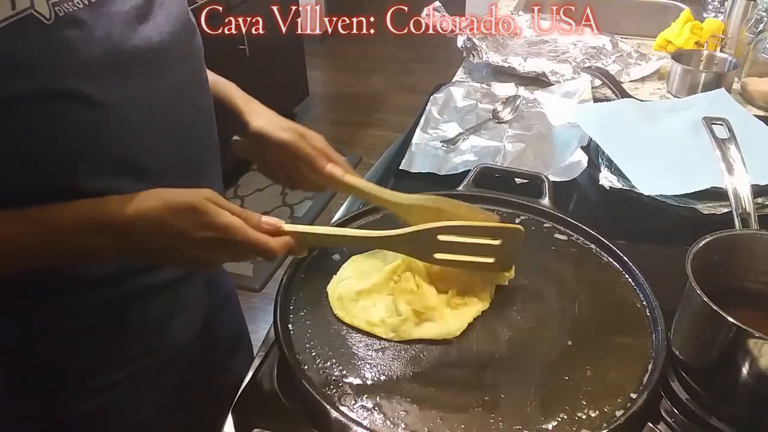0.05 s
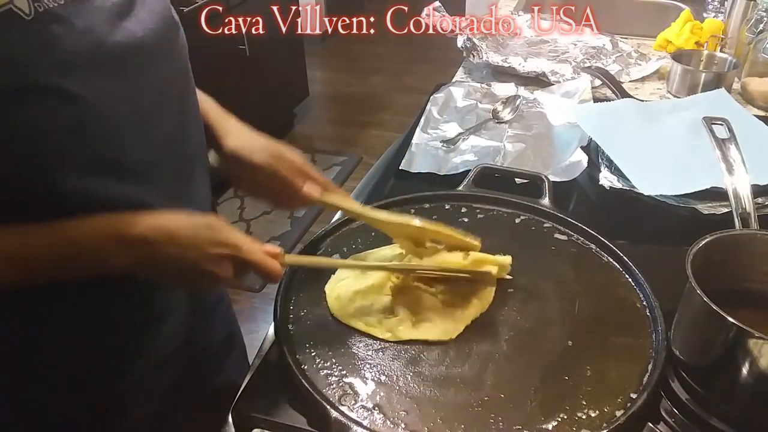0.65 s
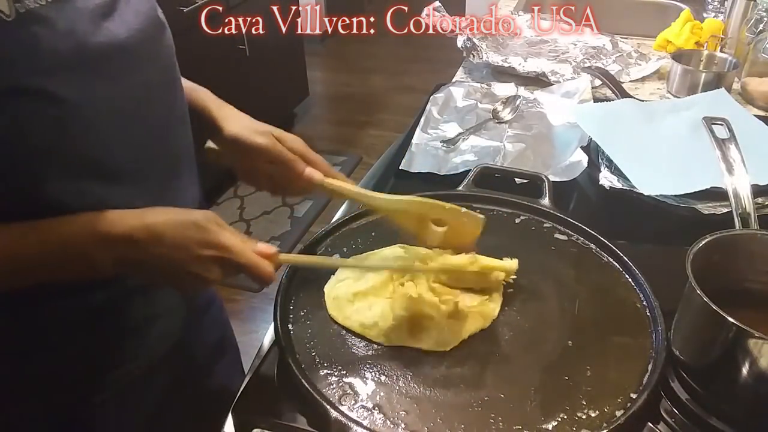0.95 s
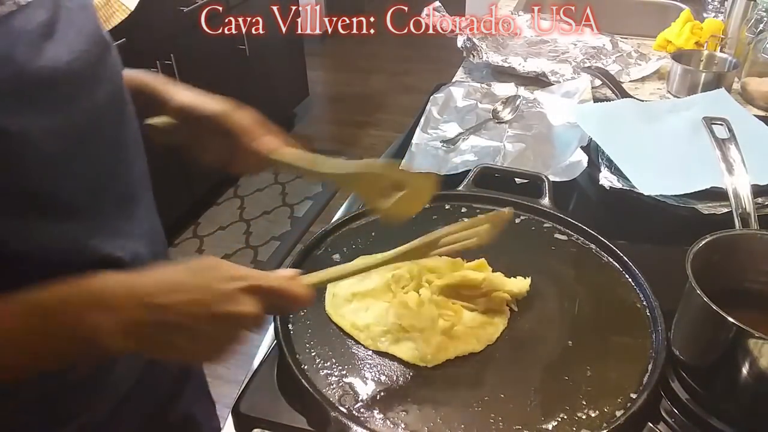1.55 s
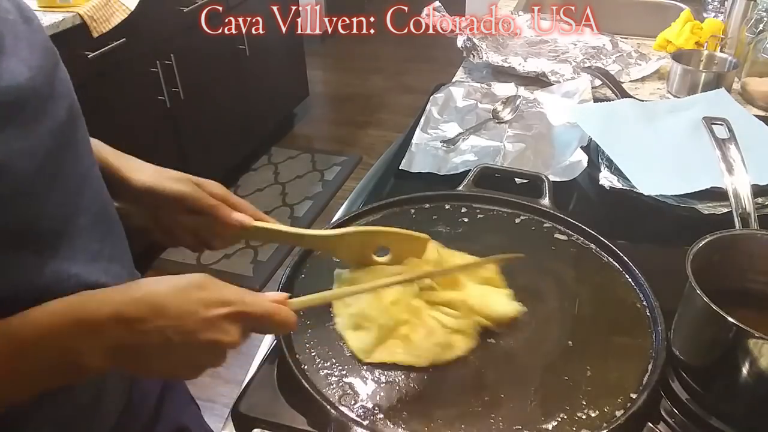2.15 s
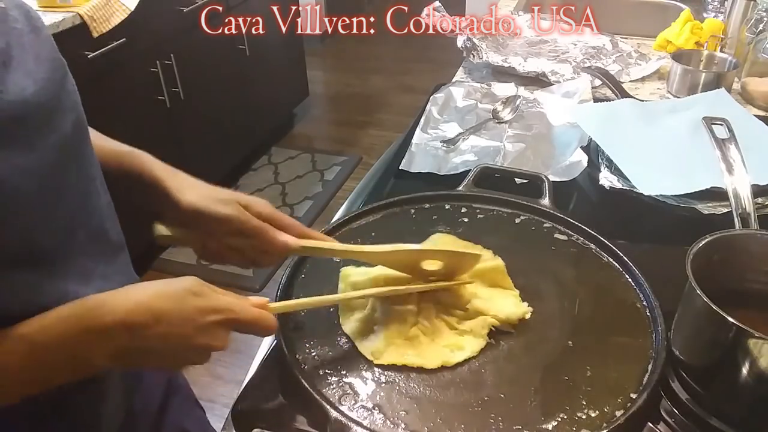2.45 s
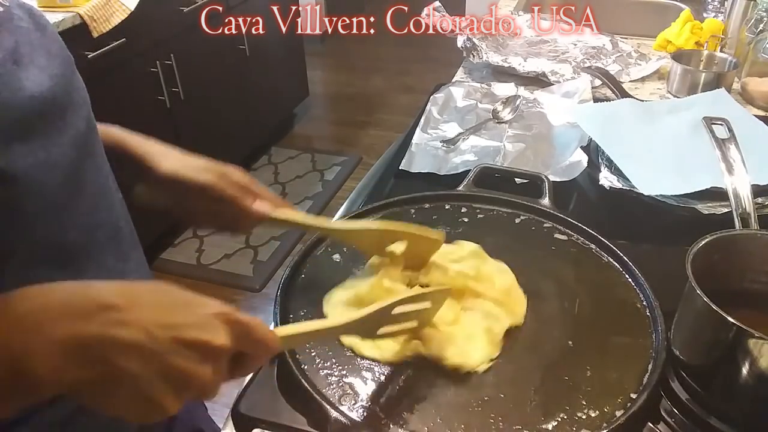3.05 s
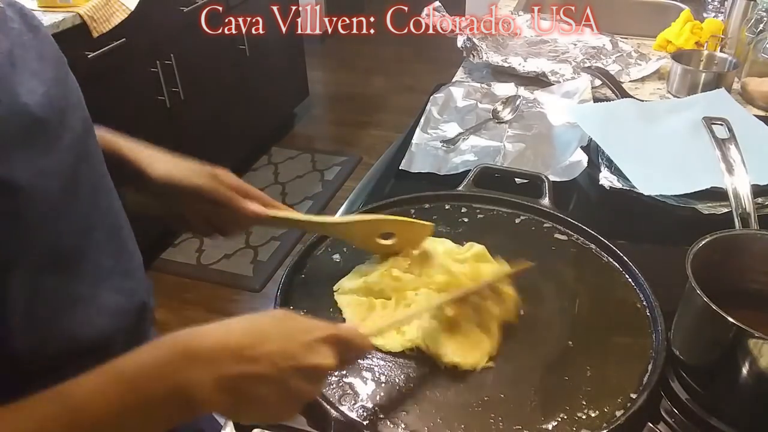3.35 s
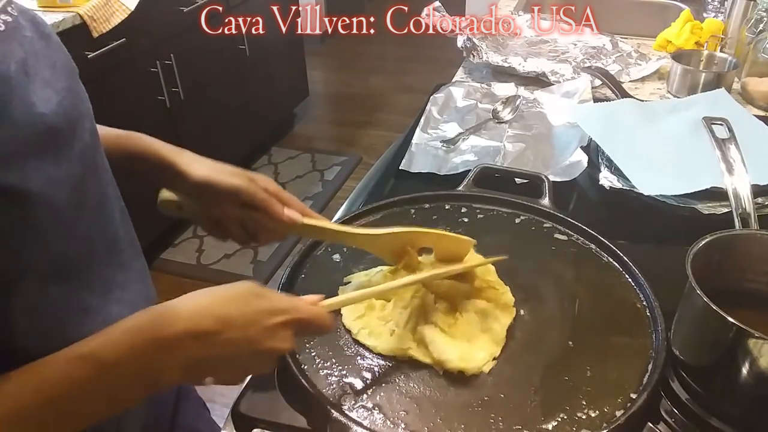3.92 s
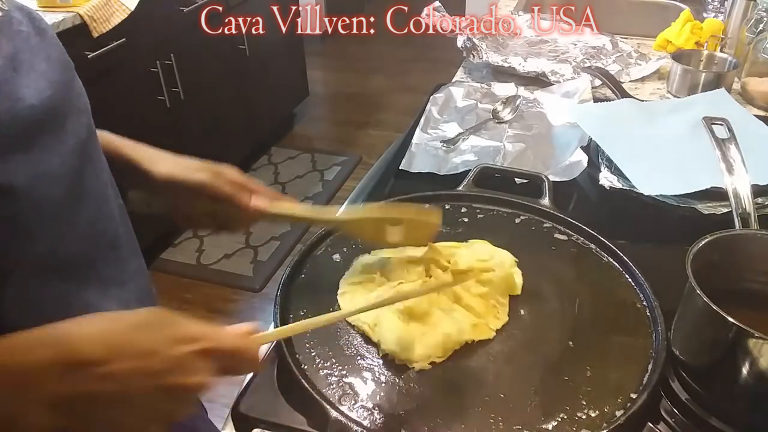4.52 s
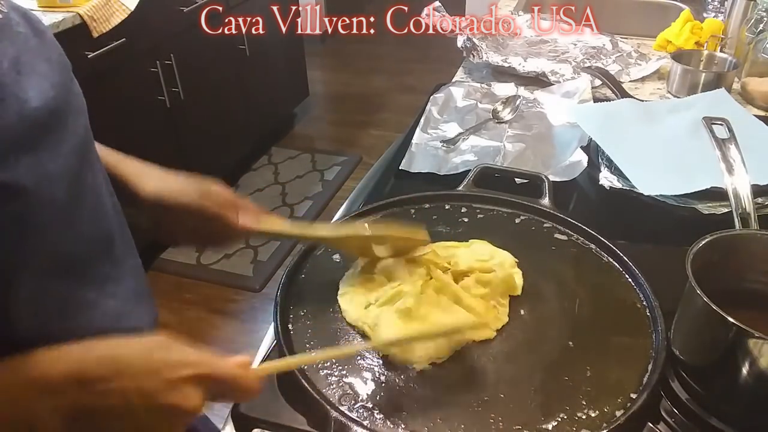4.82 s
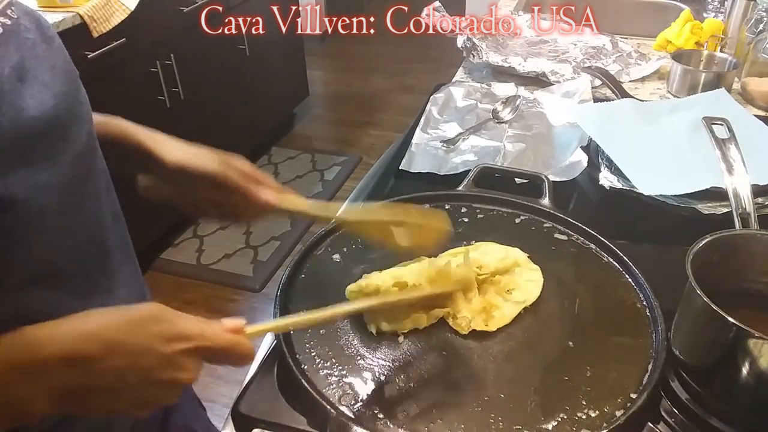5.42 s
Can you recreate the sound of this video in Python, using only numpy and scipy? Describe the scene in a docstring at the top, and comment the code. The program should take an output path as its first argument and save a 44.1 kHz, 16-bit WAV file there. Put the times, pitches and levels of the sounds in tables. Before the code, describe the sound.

Two wooden spatulas knock, tick and scrape on an oiled griddle, tearing flatbread over a low fan hum.

```python
"""A small, hard-walled kitchen, one microphone close above the stove. A fan hums low from the start.
Two wooden spatulas tick together, knock on the oiled griddle and scrape in short stick-slip strokes,
tearing a flatbread. The pressed plate thumps softly, a dragged blade sings and an edge squeaks once.
From 1.5 s oil spits faintly; from 2 s the slotted spatula grazes the plate and its tines chatter.
The hardest push comes just after 5 s. The room answers every contact."""
import sys
import numpy as np
from scipy import signal
from scipy.fft import rfft, irfft, next_fast_len
from scipy.io import wavfile
from scipy.ndimage import map_coordinates

SR = 44100
rng = np.random.default_rng(int(sys.argv[2]) if len(sys.argv) > 2 else 0)


def bounce(signal):
    """Save signal as a 16-bit WAV file at the path given by the first command-line argument."""
    frames = np.transpose(np.atleast_2d(signal))
    limited = np.clip(frames, -1, 1)
    pcm = np.round(limited * 32767).astype(np.int16)
    wavfile.write(sys.argv[1], SR, pcm)


N = 250288
LENGTH = 3 * 2 ** 13  # samples in one contact with its echoes, about 0.56 s
T, HZ = np.arange(LENGTH) / SR, np.fft.rfftfreq(LENGTH, 1 / SR)


def amp(db):
    """Decibels to gain."""
    return 10 ** (np.asarray(db) / 20)


def unit(x):
    """Scaled to rms 1."""
    return x / np.sqrt(np.mean(x ** 2) + 1e-20)


def along(points, hz):
    """A curve through (frequency_hz, value) points on a log frequency axis."""
    frequencies, values = np.transpose(points)
    return np.interp(np.log(hz + 1), np.log(frequencies), values)


def add(track, s, x):
    """Mix x into the track from time s on."""
    start = max(round(s * SR), 0)
    track[start:start + len(x)] += x[:N - start]


def wander(knots, count=LENGTH):
    """A smooth random curve of count points."""
    return map_coordinates(rng.standard_normal(int(knots) + 4), [np.arange(count) * knots / count])


def resonant(modes, base_db):
    """Gain of a body: its resonances stand over a flat base."""
    peaks = sum(amp(db) ** 2 / (1 + (2 * (HZ - hz) / width) ** 2) for hz, width, db in modes)
    return np.sqrt(amp(base_db) ** 2 + peaks)


def struck(gain):
    """The causal impulse response with this gain, of energy 1."""
    cepstrum = irfft(np.log(np.maximum(gain, 1e-6)))
    cepstrum[1:LENGTH // 2] *= 2
    cepstrum[LENGTH // 2 + 1:] = 0
    response = irfft(np.exp(rfft(cepstrum)))
    return response / np.linalg.norm(response)


def slips(per_s, spread_db):
    """Tiny stick-slip releases at random moments and of very unequal size."""
    releases = (rng.random(LENGTH) < per_s / SR) * rng.standard_normal(LENGTH)
    return releases * amp(spread_db * rng.standard_normal(LENGTH))


def push(rise_s, fall_s):
    """Force of a stroke and its time to peak: it swells smoothly, then eases by 20 dB in fall_s."""
    lead = min(2 * rise_s, .15)
    swell = np.exp(-2 * ((T - lead) / rise_s) ** 2)
    return np.where(T < lead, swell, amp(-20 * (T - lead) / fall_s)), lead


# Decay of the room around the stove: frequency_hz, t60_s
ROOM_DECAY = [(150, 0.38), (500, 0.31), (1400, 0.35), (3700, 0.39), (10000, 0.24)]
def kitchen(x, wet_db):
    """A contact with its echoes, which differ for every spot on the griddle."""
    hz, t, noise = signal.stft(rng.standard_normal(LENGTH), SR, nperseg=256)
    decay = amp(-60 * t / along(ROOM_DECAY, hz)[:, None])
    tail = signal.istft(noise * decay, SR, nperseg=256)[1][:LENGTH]
    uneven_db = 3 * np.exp(-T / 0.036) * wander(400)  # early wall echoes, soon merging
    tail *= (1 - np.exp(-T / 0.002)) * amp(uneven_db)
    echoes = signal.fftconvolve(x, tail / np.linalg.norm(tail))[:LENGTH]
    fade = np.clip((T[-1] - T) / .1, 0, 1) ** 2
    return fade * (x + amp(wet_db) * echoes)


# Moving air behind everything: frequency_hz, density_db
FAN_AIR = [(15, -36), (30, -79), (60, -28), (90, -15), (150, -7.5), (280, 0.5), (430, -2.5), (700, -8),
           (1100, -10), (2000, -17.5), (3300, -21.5), (4900, -21.5), (6200, -29.5), (8000, -29.5),
           (11500, -32), (13000, -46), (16000, -58)]
# The fan's hum lines: pitch_hz, level_db
FAN_HUM = [(60, -91), (264, -76.5), (404, -82)]
def fan():
    """Steady air noise with a few slightly unsteady lines."""
    t = np.arange(N) / SR
    colour = amp(along(FAN_AIR, np.fft.rfftfreq(N, 1 / SR)))
    air = unit(irfft(rfft(rng.standard_normal(N)) * colour, N))
    hum = sum(amp(db) * np.sin(2 * np.pi * hz * t + 0.41 * wander(45, N)) for hz, db in FAN_HUM)
    return amp(-70.5) * air + hum


# Resonances of the slotted spatula: pitch_hz, width_hz, level_db
TINE_MODES = [(1530, 78, 1), (1810, 110, -11), (2553, 117, -0.5), (2795, 150, -1.5), (3166, 95, -3.5),
              (3700, 92, 1.5), (4063, 55, 1.5), (4270, 76, -4.5), (4780, 170, 1.5), (5150, 220, -0.5),
              (5570, 100, -1.5), (5900, 100, -1), (6580, 280, -8.5), (6970, 160, -0.5), (7530, 170, -7),
              (8940, 77, -13)]
def tines_gain(focus_hz, focus_db=15, focus_octaves=0.23):
    """Narrow modes: the grip shifts each a little, and the contact point favours those near one pitch."""
    gain = np.zeros(len(HZ))
    for hz, width, db in TINE_MODES:
        hz *= 1 + .03 * rng.uniform(-1.03, 1)
        lift_db = focus_db * np.exp(-(np.log2(hz / focus_hz) / focus_octaves) ** 2)
        gain += amp(db + lift_db + 2 * rng.standard_normal()) / (1 + (2 * (HZ - hz) / width) ** 2) ** 1.26
    return gain


# The spatulas touch each other below the microphone: start_s, level_db, pitch_hz
SPATULA_TICKS = [(0.1733, -37, 3050), (0.581, -59, 5150), (1.8432, -54, 3930), (1.991, -43, 3180),
                 (2.951, -52, 3650), (3.001, -51, 3700), (3.172, -47.5, 3700), (4.091, -44.5, 2920),
                 (4.093, -49, 6930), (4.118, -53.5, 4000), (4.274, -49, 2590), (4.284, -57, 4700),
                 (4.476, -56, 5260), (4.538, -50, 4950), (4.985, -59, 7400), (5.076, -67, 4950)]
def ticks(click_t60_s=0.021, note_t60_s=.085):
    """A light touch clicks through the tines' modes and leaves one high note ringing."""
    track = np.zeros(N)
    for s, db, hz in SPATULA_TICKS:
        touch = rng.standard_normal(LENGTH) * amp(-60 * T / click_t60_s)
        click = signal.fftconvolve(touch, struck(tines_gain(hz)))[:LENGTH]
        note = np.sin(2 * np.pi * hz * T) * amp(-9 - 60 * T / note_t60_s)
        add(track, s, kitchen(amp(db - 8.5) * (click + note), wet_db=-2.5))
    return track


# Resonances of the wooden blade: pitch_hz, width_hz, level_db
BLADE_MODES = [(1510, 62, 9), (1880, 46, 2), (2130, 85, 1), (2350, 350, 0.5), (2830, 260, 4.5),
               (3070, 84, -21), (3760, 320, 1.5), (4050, 230, 5), (4900, 540, 0), (4520, 220, 8),
               (5160, 360, 5), (5850, 320, 2), (6680, 300, 1.5), (7080, 250, 2.5), (7520, 85, 8),
               (8140, 810, 1)]
def blade_gain(base_db, scatter_db, ripple_db):
    """The contact point decides how strongly each mode is fed, and cuts notches between them."""
    modes = [(hz, width, db + scatter_db * rng.standard_normal()) for hz, width, db in BLADE_MODES]
    return resonant(modes, base_db) * amp(ripple_db * np.minimum(wander(130, len(HZ)), .8))


# Resonances of the griddle plate: pitch_hz, width_hz, level_db
PLATE_MODES = [(179, 20, -20), (387, 69, -4), (476, 12, -8), (630, 3.7, -35), (645, 4.7, -9), (734, 6.4, 6),
               (760, 25, 8.5), (976, 13, 10.5), (1275, 9.7, 11), (1215, 76, -6), (1593, 45, -14),
               (1690, 27, 6), (1690, 29, 8), (2000, 240, 7), (2200, 7.2, -12), (2660, 44, 13.5)]
def plate_gain(base_db):
    """The plate rings in the same modes whether knocked or scraped."""
    return resonant(PLATE_MODES, base_db)


def rattle(count=5, gap_s=.012, bounce_db=-14, skid_t60_s=.008):
    """One landing, then equal, lighter bounces at uneven gaps, each smeared by a short skid."""
    bounces = np.zeros(LENGTH)
    times = np.cumsum(gap_s * (.5 + rng.random(count)))
    bounces[(times * SR).astype(int)] = amp(bounce_db)
    skid = rng.standard_normal(LENGTH) * amp(-60 * T / skid_t60_s)
    return (T == 0) + signal.fftconvolve(bounces, skid / np.linalg.norm(skid))[:LENGTH]


# Tone of a blow from above the stove: frequency_hz, density_db
KNOCK_COLOUR = [(60, -23), (200, -18), (300, -11.5), (420, 2.5), (800, 3.5), (1600, 1.5), (2000, -1.5),
                (3000, -7), (4300, -14.5), (5400, -22.5), (6500, -31), (9000, -37.5), (12000, -60),
                (15000, -53)]
# Wood lands on the plate; weight shapes the lows, snap the highs:
# start_s, level_db, weight_db, snap_db, room_db, skid_share, spot_hz
PLATE_KNOCKS = [(0.2005, -5.5, 5, 13, -10, 0.48, 800), (0.204, -11.5, 2, 8.5, -4, 0.57, 1130),
                (0.2115, -11.5, 8, 24.5, -2.5, 0.8, 500), (0.227, -15, 15, 19, -11.5, 0.63, 624),
                (0.267, -20.5, 0.5, 6, -17, .6, 790), (0.3030, -22, -20, 13, -25, .7, 1670),
                (0.684, -16, -15.5, 10.5, 2.5, 0.96, 1720), (0.689, -26, 40, 3, -6, 0.99, 553),
                (0.9037, -10, 24, 20.5, 9, 0.47, 600), (0.917, -0.5, -6.5, -1, -3.5, .05, 1530),
                (0.919, -9.5, 23, 22, 2.5, 0.3, 540), (0.9270, -15, 9.5, 25, 6.5, .7, 600),
                (0.992, -14, 18, 7, -1, .8, 640), (1.124, -19.5, -23, 23, 1.5, 0.8, 5900),
                (1.1317, -14, -25, 0, -4, 0.3, 1180), (1.137, -17, -11, 15, -2.5, 1, 2740),
                (1.3384, -13.5, -38, -10, -2.5, 0, 1390), (1.3441, -12, -26, 6, -2.5, 0.5, 1170),
                (1.574, -13, -21, 22.5, -7.5, 0.9, 4400), (2.5712, -12, -14, 33, -0.5, 0.86, 1540),
                (3.9255, -18.5, -22, 35, -5, 0.2, 4400), (5.2090, -11.5, 22, 6, 2, .6, 610),
                (5.226, -10.5, -4, 5, -2.5, 1, 2000), (5.258, -16.5, 11, 6, -0.5, 0.7, 850),
                (5.404, -19, -15, 13, 0, 0.5, 725)]
def knocks(bite_rise_s=0.00092, bite_t60_s=0.027):
    """A pressure pulse, or a brief skid if the blow glances, rings the plate; then the blade rattles."""
    track = np.zeros(N)
    radiation = HZ ** 2 / np.hypot(HZ ** 2, 258 ** 2)  # the small plate gives little below 258 Hz
    body = amp(along(KNOCK_COLOUR, HZ)) * plate_gain(base_db=8) * radiation
    soft = 1 / (1 + 1j * HZ / 3200) ** 2
    for s, db, weight_db, snap_db, room_db, skid, spot_hz in PLATE_KNOCKS:
        contact = amp(along([(750, weight_db), (1500, 0.018), (5000, snap_db)], HZ))
        wood = blade_gain(base_db=8, scatter_db=2, ripple_db=2)
        spot = resonant([(spot_hz, spot_hz / 2.6, 6.5)], base_db=3)  # the struck spot favours one pitch
        onset = 1 - np.exp(-T / (bite_rise_s * np.clip(skid, .01, 1)))
        bite = rng.standard_normal(LENGTH) * onset * amp(-60 * T / bite_t60_s)
        pulse = np.sqrt(1 - np.clip(skid, 0, 1)) * soft
        force = pulse + np.sqrt(np.abs(1 - np.abs(pulse) ** 2)) * rfft(bite / np.linalg.norm(bite))
        blow = irfft(force * rfft(rattle()) * rfft(struck(body * contact * wood * spot)))
        add(track, s, kitchen(amp(db - 3.5) * blow, wet_db=room_db))
    return track


def breakaway(rise_s, lead_s, slide_share=0.6):
    """Past the strongest push the blade comes unstuck and slides with less friction."""
    sliding = np.maximum(T - lead_s, 0) / (3 * rise_s)
    return slide_share + (1 - slide_share) * np.exp(-sliding ** 2)


def squelch(pitch_hz=2905, spread_octaves=.55, swell_s=0.005):
    """Small pockets of oil under the bread open at random moments, each with a brief note of its own."""
    when, pitch, size = rng.random(size=(3, 40, 1))
    t = T[:LENGTH // 12]
    hz = pitch_hz * 2 ** (spread_octaves * np.sqrt(12) * (pitch - .5))
    notes = (.5 + size) * t * np.exp(-t / swell_s) * np.sin(2 * np.pi * hz * t)
    places = (when * LENGTH).astype(int) + np.arange(len(t))
    return unit(np.bincount(places.ravel(), notes.ravel(), LENGTH)[:LENGTH])


# Borders between the plate, blade, rasp, edge and oil bands: frequency_hz
BAND_EDGES_HZ = [1150, 2300, 5600, 9300]
# Tone of a scrape from above the stove: frequency_hz, density_db
SCRAPE_COLOUR = [(110, -34), (180, 5.5), (400, 4.5), (650, 5.5), (1000, -4.5), (1250, -10.5), (1550, -1.5),
                 (2700, -1.5), (4700, -6.5), (6000, -13.5), (8000, -16.5), (10000, -21.5), (12000, -39.5),
                 (15000, -30)]
# Strokes across the griddle, the four band levels relative to the rasp band:
# peak_s, level_db, plate_db, blade_db, edge_db, oil_db, rise_s, fall_s
SCRAPE_STROKES = [(0.204, -51, -16, 8, -6, -26, 0.0078, 0.03),
                  (0.685, -39, -16, -6.5, -12.5, -15, 0.012, 0.11),
                  (0.919, -55, -20, -9, -3, 0, 0.006, 0.033), (1.119, -46, -37, -0.5, -8, -11, 0.01, 0.038),
                  (1.138, -42, -17, 0.5, -13, -18, 0.011, 0.03),
                  (1.338, -46, -38, -5, -8.5, -18, 0.0071, 0.088),
                  (1.556, -51.5, -16, 1, 0, -19, 0.013, 0.041),
                  (1.578, -46, -12.5, 4, -23, -24, 0.0099, 0.01),
                  (2.049, -52, -32, -18, -30, -31, 0.033, 0.092),
                  (2.13, -58, -10.5, -29, -5.5, -14, 0.026, 0.089),
                  (2.344, -42.5, -19, -7.5, -17.5, -40, 0.012, 0.13),
                  (2.424, -45, -18, -2.5, -13, -27.5, 0.061, 0.12),
                  (2.576, -41, -25, -1, -10, -16, 0.011, 0.039),
                  (2.64, -49.5, -36, -31, -10, -20.5, 0.025, 0.2),
                  (2.768, -46, -33, -21, -8.5, -15.5, 0.013, 0.099),
                  (3.2, -67.5, -11, -18, -1.5, -14, 0.022, 0.52),
                  (3.375, -43.5, -34, -15.5, -13, -50, 0.083, 0.088),
                  (3.41, -49.5, -24, -4, -6.5, -36, 0.019, 0.08),
                  (3.711, -42, -27, -18, -9, -18.5, 0.013, 0.099),
                  (3.792, -49.5, -26, -38, -15, -30, .02, 0.11),
                  (3.927, -46, -48, -28, -8, -44, 0.034, 0.041),
                  (4.1, -63, -20, -5, -12, -22, 0.013, 0.059), (4.319, -67, -20, -5, -9, -12, .03, 0.067),
                  (4.649, -58, -29, -15, -11, -19, 0.038, 0.18),
                  (4.736, -39.5, -42, -13, -10.5, -23.5, 0.041, 0.1),
                  (5.197, -36, -3.5, -9, -14, -14.5, 0.0065, 0.067),
                  (5.211, -31, -31, -6, -31, -35, 0.0081, 0.059),
                  (5.231, -37.5, 2, 2, -12, -20, 0.015, 0.12),
                  (5.401, -35.5, -30, -13.5, -20.5, -29, 0.037, 0.046),
                  (5.5, -44.5, -37, -17.5, -19, -23, 0.042, 0.16),
                  (5.562, -46.5, -30, -0.5, -8.5, -30, 0.015, 0.085)]
def scrapes(firm_db=-47.5):
    """Slips under each stroke ring blade and plate; a sharp edge adds hiss and squeezed oil crackles."""
    track = np.zeros(N)
    below = [1 / (1 + (HZ / hz) ** 9) for hz in BAND_EDGES_HZ]
    bands = np.diff([0 * HZ, *below, 1 + 0 * HZ], axis=0)
    colour = amp(along(SCRAPE_COLOUR, HZ))
    plate = colour * plate_gain(base_db=0)
    for s, db, plate_db, blade_db, edge_db, oil_db, rise, fall in SCRAPE_STROKES:
        # a lightly pressed blade chatters in separate slips, with deep valleys between its modes
        pressure_db = db - firm_db
        slips_per_s = np.clip(9000 * amp(1.6 * pressure_db), 2000, 30000)
        friction = rfft(slips(slips_per_s, spread_db=3.6))
        blade = colour * blade_gain(base_db=-6 + .7 * pressure_db, scatter_db=2.5, ripple_db=3.5)
        parts = zip(bands, [plate, blade, blade, blade], [plate_db, blade_db, 0, edge_db])
        rasp = sum(amp(level) * unit(irfft(friction * band * body)) for band, body, level in parts)
        oil = amp(oil_db) * unit(irfft(rfft(slips(per_s=1500, spread_db=2)) * bands[-1] * colour))
        catch_db = 1.5 * wander(55)  # the bread catches and lets go
        grit_db = 1.5 * wander(260)  # crumbs make the slips come in clumps
        blips = amp(-6 - 0.4 * pressure_db) * squelch()  # clearest under a light touch
        force, lead = push(rise, fall)
        force *= breakaway(rise, lead) * amp(catch_db + grit_db)
        add(track, s - lead, kitchen(amp(db - 6.5) * force * (rasp + oil + blips), wet_db=-3.5))
    return track


def nudges(from_s=3, every_s=0.49, level_db=-52.5, pitch_hz=419):
    """Faint rocking while the bread is folded: six more thump rows at uneven moments."""
    chance = 2 * rng.random(size=(6, 3)) - 1
    return [(from_s + every_s * (k + when / 2), level_db + 3 * force, pitch_hz * (1 + .05 * spot), .08)
            for k, (when, force, spot) in enumerate(chance)]


# The griddle gives under a push: start_s, level_db, pitch_hz, t60_s
GRIDDLE_THUMPS = [(0.685, -49, 187, 0.083), (0.737, -43, 175.5, 0.083), (0.922, -43, 198, 0.11),
                  (1.08, -48.5, 174, 0.066), (1.425, -41.5, 420, 0.066), (1.629, -51, 190, 0.09),
                  (2.334, -50, 410, 0.1), (2.36, -45, 180, 0.13), (2.629, -51, 195, 0.1),
                  (2.672, -45.5, 402, 0.12), (2.724, -45.5, 433, 0.089), (2.879, -46.5, 410, 0.073),
                  (3.645, -50, 402, 0.2), (3.664, -44.5, 204.3, 0.18), (3.754, -44, 191, 0.1),
                  (4.064, -50.5, 204, 0.17), (4.36, -50, 213, 0.077), (5.203, -29, 403, 0.095),
                  (5.223, -25, 404, 0.039), (5.239, -37.5, 175.4, 0.21), (5.396, -45, 180, 0.091),
                  (5.525, -48, 196.5, 0.14)]
def thumps():
    """Pushes cushioned by the bread ring only a low mode, whose pitch wavers under the load."""
    track = np.zeros(N)
    for s, db, hz, t60 in GRIDDLE_THUMPS + nudges():
        swell = (1 - np.exp(-T / 0.0028)) ** 2 * amp(-60 * T / t60)
        note = np.sin(2 * np.pi * hz * T + .35 * wander(60))
        add(track, s, kitchen(amp(db - 4.5) * swell * note, wet_db=-4.5))
    return track


# The dragged blade sings: peak_s, level_db, pitch_hz, fall_s
BLADE_NOTES = [(0.686, -44, 1580, .025), (1.124, -54.5, 6056, 0.017), (1.142, -48.5, 3850, 0.018),
               (1.137, -48.5, 1127, 0.054), (1.345, -48.5, 1023, 0.045), (1.584, -62, 1540, 0.048),
               (2.41, -51.5, 1530, 0.054), (2.43, -61, 1870, 0.048), (2.42, -56, 1170, .05),
               (2.439, -55.5, 920, 0.051), (2.585, -55, 1020, 0.027), (2.596, -53.5, 1500, 0.04),
               (2.681, -53.5, 2720, 0.033), (2.772, -50, 2737, 0.053), (2.812, -54, 2450, 0.023),
               (3.208, -65, 1810, 0.07), (3.344, -55.5, 2800, .07), (3.37, -53, 2065, 0.082),
               (3.405, -61, 1770, 0.05), (3.715, -62, 2120, .09), (4.649, -60, 1500, 0.072),
               (4.73, -58, 1750, 0.065), (4.79, -55, 2880, 0.045), (4.861, -58, 2700, 0.039),
               (5.416, -47, 1192, 0.047), (5.6, -58, 2660, 0.091)]
def sings(rise_s=.014, half_width_hz=72):
    """Friction feeds a single narrow resonance for a moment."""
    track = np.zeros(N)
    for s, db, hz, fall in BLADE_NOTES:
        force, lead = push(rise_s, fall)
        note = unit(irfft(rfft(rng.standard_normal(LENGTH)) / (1 + ((HZ - hz) / half_width_hz) ** 4)))
        add(track, s - lead, kitchen(amp(db - 1.5) * force * note, wet_db=-4))
    return track


# One chirp of an oily edge on the plate: peak_s, level_db, pitch_hz, rise_s, fall_s
EDGE_SQUEAK = (0.823, -52, 730, .009, .13)
# Its harmonics: multiple, level_db
SQUEAK_HARMONICS = [(1, 0), (2, -1), (3, -1), (4, -8), (6, -13), (7, -14)]
def squeak():
    """Wood sticks and slips at a nearly even rate, giving an unsteady pitch."""
    track = np.zeros(N)
    s, db, hz, rise, fall = EDGE_SQUEAK
    phase = 2 * np.pi * np.cumsum(hz * amp(.35 * wander(200))) / SR
    tone = unit(sum(amp(level) * np.sin(k * phase) for k, level in SQUEAK_HARMONICS))
    force, lead = push(rise, fall)
    add(track, s - lead, kitchen(amp(db) * force * tone, wet_db=-4))
    return track


# Oil fizzes, with little room on it at the microphone: peak_s, level_db, pitch_hz, fall_s
OIL_SPITS = [(1.545, -77, 13800, 0.057), (1.85, -77, 14800, 0.08), (2.075, -76, 13500, 0.051),
             (2.138, -77, 15400, 0.085), (3.18, -70.5, 8630, 0.11), (4.63, -70.5, 8700, 0.14),
             (4.73, -66, 9100, 0.064)]
def spits(rise_s=.008, relative_width=0.066):
    """Tiny oil bubbles of like size burst in a cluster."""
    track = np.zeros(N)
    for s, db, hz, fall in OIL_SPITS:
        swell, lead = push(rise_s, fall)
        bursts = slips(per_s=1500, spread_db=1)
        fizz = unit(irfft(rfft(bursts) / (1 + ((HZ / hz - 1) / relative_width) ** 4)))
        add(track, s - lead, kitchen(amp(db) * swell * fizz, wet_db=-13.5))
    return track


# The slotted spatula grazes the plate: peak_s, level_db, focus_hz, rise_s, fall_s
TINE_GRAZES = [(1.998, -53.5, 2980, 0.0093, 0.057), (2.047, -56, 3370, 0.029, 0.099),
               (2.136, -64.5, 5200, 0.0097, 0.14), (2.89, -60.5, 5150, 0.025, 0.14),
               (3.177, -63, 4100, .006, 0.077), (3.253, -60.5, 2670, 0.035, 0.34),
               (4.098, -67, 2660, .007, 0.055), (4.281, -62.5, 2730, 0.0055, 0.05),
               (4.327, -61, 3150, 0.021, 0.08), (4.63, -55, 3140, 0.008, 0.47)]
def grazes():
    """Sparse slips under a very light touch let the tines ring freely."""
    track = np.zeros(N)
    for s, db, hz, rise, fall in TINE_GRAZES:
        force, lead = push(rise, fall)
        chatter = force * unit(slips(per_s=1300, spread_db=2.5))
        ring = signal.fftconvolve(chatter, struck(tines_gain(hz)))[:LENGTH]
        add(track, s - lead, kitchen(amp(db - 4.5) * ring, wet_db=-4.5))
    return track


def scene():
    """Everything at one microphone close above the stove."""
    mix = fan() + ticks() + knocks() + scrapes() + thumps() + sings() + squeak() + spits() + grazes()
    return mix[None]


def record(dry):
    """The recorder keeps nothing above its band limit."""
    top_hz = 15950
    size = next_fast_len(N + SR // 2)
    return irfft(rfft(dry, size) * (np.fft.rfftfreq(size, 1 / SR) < top_hz), size)[:, :N]


dry = scene()
out = record(dry)
bounce(out)
```